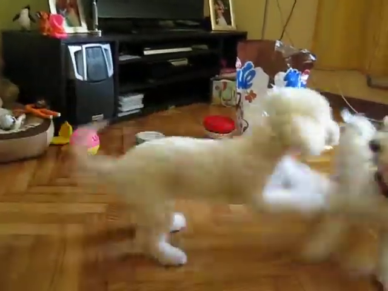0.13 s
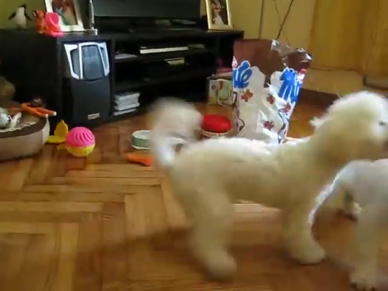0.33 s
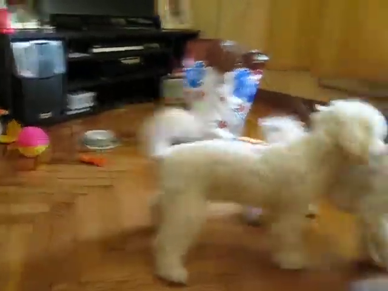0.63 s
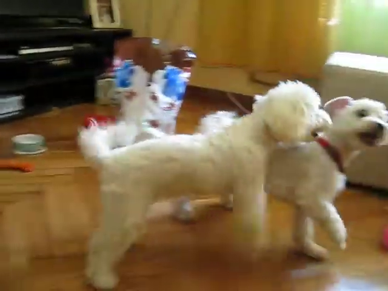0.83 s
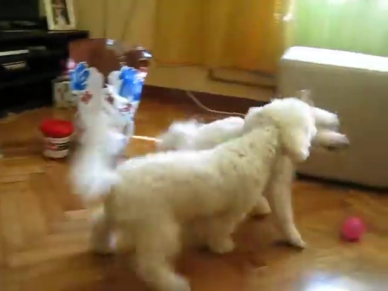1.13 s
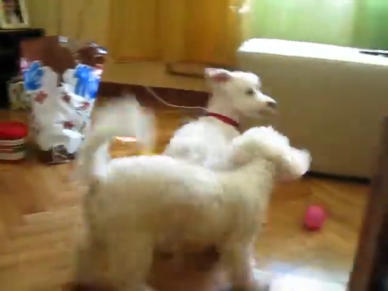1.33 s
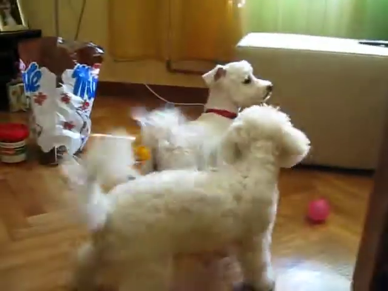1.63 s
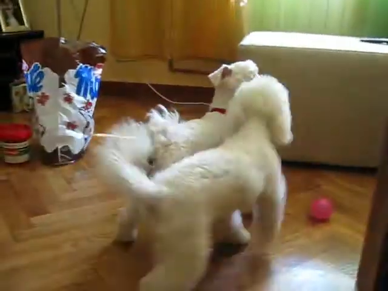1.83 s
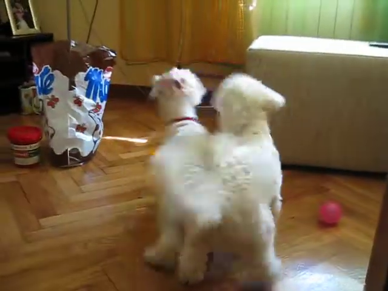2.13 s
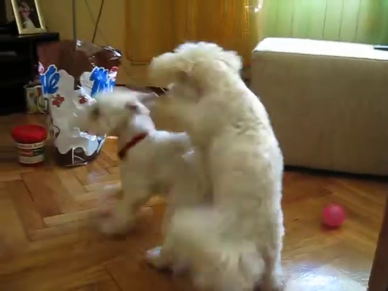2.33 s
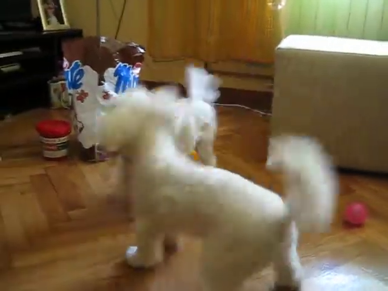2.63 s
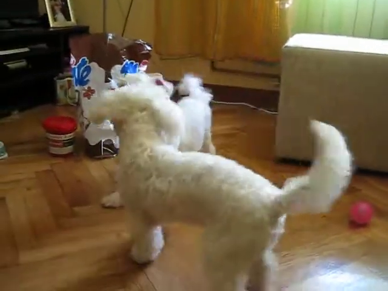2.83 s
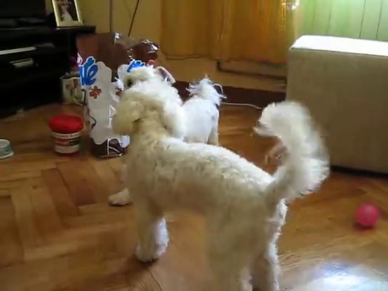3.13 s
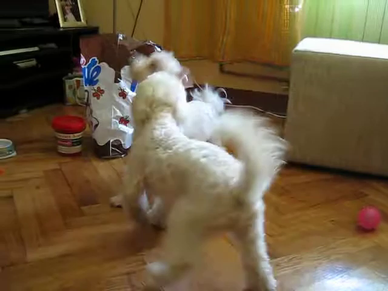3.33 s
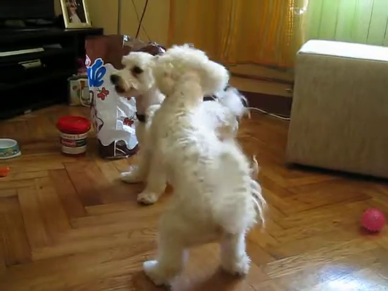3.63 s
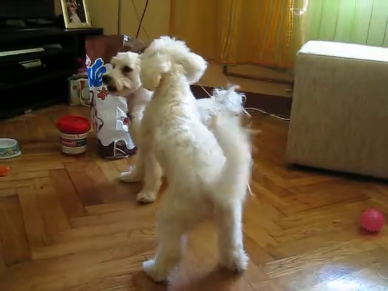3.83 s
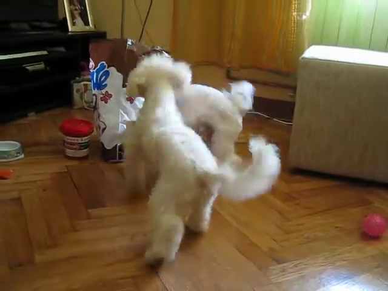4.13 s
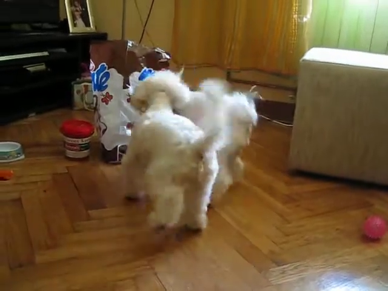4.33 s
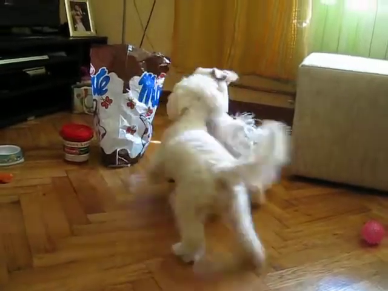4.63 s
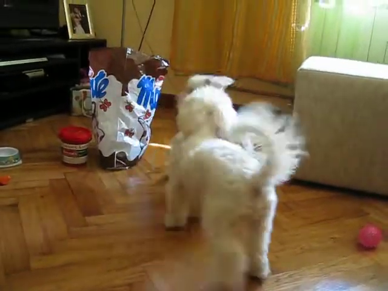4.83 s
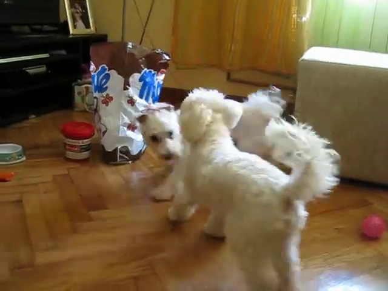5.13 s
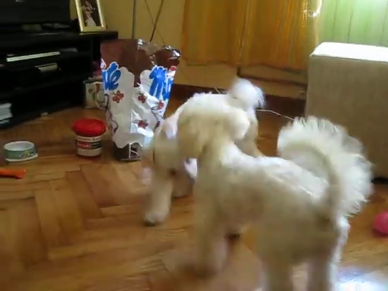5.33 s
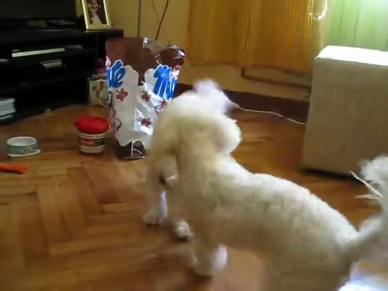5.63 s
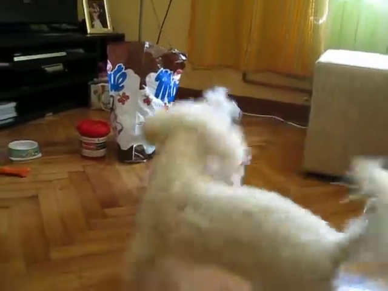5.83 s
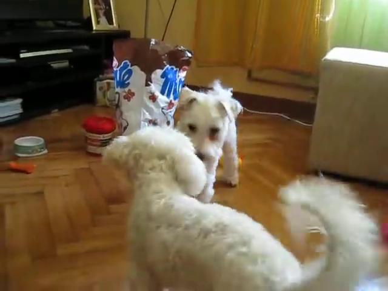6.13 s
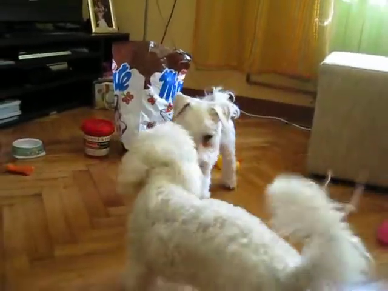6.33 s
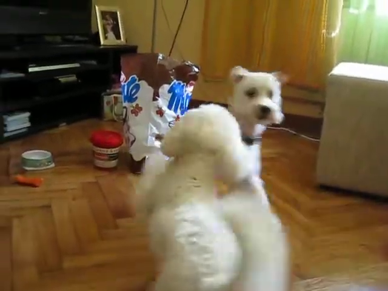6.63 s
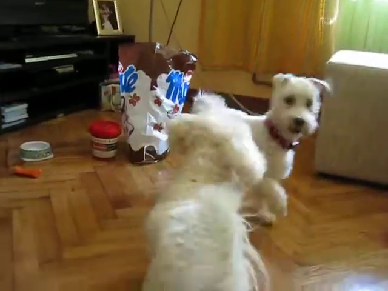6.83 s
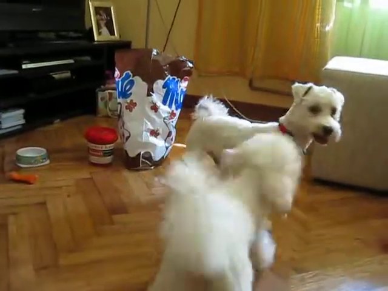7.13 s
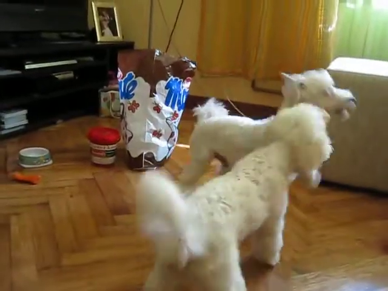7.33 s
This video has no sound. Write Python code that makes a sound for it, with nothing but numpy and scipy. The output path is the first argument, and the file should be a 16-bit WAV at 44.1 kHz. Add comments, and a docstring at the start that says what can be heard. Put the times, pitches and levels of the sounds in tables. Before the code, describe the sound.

Claws rattle quickly on hardwood at once, then thin out into separate ticks and scrapes. A strong flurry of clicks and low paw knocks erupts a little past two seconds, drops almost to stillness, and resumes as lighter scuffling with a tiny metallic tag jingle. Later steps grow sparse and soft before a last hard tick. Close, slightly dull handheld pickup in a lively living room, with faint air and hiss.

```python
"""A living room with a parquet floor: two small dogs wrestle a step or two from a hand-held camera.
Claws tick and skid on the wood, paws thump and squeak: short noisy pushes and rubs through resonances.
Fur brushes as filtered grainy noise; now and then a metal collar tag tinkles as a set of decaying sines.
A diffuse noise tail answers the contacts; under it all lie faint still air and a thin microphone hiss."""
import sys
import numpy as np
from scipy import signal
from scipy.fft import rfft, irfft, next_fast_len
from scipy.io import wavfile
from scipy.ndimage import uniform_filter1d, map_coordinates

SR = 44100
rng = np.random.default_rng(int(sys.argv[2]) if len(sys.argv) > 2 else 0)


def digitize_waveform(pressure):
    """Quantize a signal to 16-bit integers and store it at the path in sys.argv[1].

    Rows of a 2-D input are taken as channels; values are limited to [-1, 1].
    """
    field = np.atleast_2d(pressure).T
    bounded = np.clip(field, -1, 1)
    quanta = np.round(bounded * 32767).astype(np.int16)
    wavfile.write(sys.argv[1], SR, quanta)


N = 329427  # samples in the scene
SIZE = 2 ** 12  # samples in one short contact
HZ, TIME = np.fft.rfftfreq(SIZE, 1 / SR), np.arange(SIZE) / SR

# colour of feet and coats rubbing, before each rub's own resonance: (f/Hz, level/dB)
RUB_COLOUR = [(100, -22), (350, 4), (1000, 4.5), (2000, 0), (5000, -6.5), (9000, -7), (16000, -23)]


def amp(db):
    """Gain of a level in dB."""
    return 10 ** (np.asarray(db) / 20)


def unit(x):
    """x at rms 1."""
    return x / np.sqrt(np.mean(x ** 2) + 1e-20)


def along(points, hz):
    """Values between (f/Hz, value) points, on a log frequency axis."""
    f, v = np.transpose(points)
    return np.interp(np.log(hz + 1), np.log(f + 1), v)


def hump(hz, centre, q):
    """Gain of one broad resonance."""
    ratio = (hz + 1) / centre
    return 1 / np.sqrt(1 + (q * (ratio - 1 / ratio)) ** 2)


def filtered(x, response):
    """x times a response of frequency."""
    m = next_fast_len(len(x) + SR // 2)
    spectrum = rfft(x, m) * response(np.fft.rfftfreq(m, 1 / SR))
    return irfft(spectrum, m)[:len(x)]


def causal(x, gain):
    """A short sound through the minimum-phase filter of this gain, so that nothing rings ahead of the touch."""
    cepstrum = irfft(np.log(np.maximum(gain, 1e-6)))
    cepstrum[1:SIZE // 2] *= 2
    cepstrum[SIZE // 2 + 1:] = 0
    return irfft(rfft(x) * np.exp(rfft(cepstrum)))


def add(track, s, x):
    """Mix x into the track at s seconds."""
    start = max(round(s * SR), 0)
    track[start:start + len(x)] += x[:max(N - start, 0)]


def contact(gain, t60, room_db, snap, span, grit=0.7):
    """A sharp push, its uneven chatter and the room's answer; the direct part has the energy of rms 1 over span s."""
    catches = rng.standard_normal(SIZE) * np.exp(grit * rng.standard_normal(SIZE))
    chatter = catches * amp(-60 * TIME / max(t60, .002))
    chatter /= np.linalg.norm(chatter)
    chatter[0] += snap  # the first touch is the sharpest
    blow = causal(chatter, gain)
    push = causal(1. * (TIME == 0), gain)
    out = answer(push / np.linalg.norm(push), room_db)  # the room keeps the blow's colour but blurs its chatter
    out[:SIZE] += blow / np.linalg.norm(blow)
    return out * np.sqrt(span * SR)


def claws():
    """The hard strikes as the dogs push off and land, each a nail on wood."""
    # (t/s, level/dB, wood f/Hz, wood over the nail/dB, nail f/Hz, crack over the nail/dB, room/dB)
    strikes = [(.003, -24, 3270, -9, 5800, 1, 0), (.062, -21, 3600, -3, 5300, 1, -6),
               (.077, -24, 2220, -12, 6200, -6, -2), (.097, -25.5, 1450, -10, 4650, -3, -3),
               (.118, -25, 3600, -6, 5000, -5, -6), (0.179, -26, 1140, -1, 4700, -3, -4),
               (.2105, -20.5, 2350, -11, 5030, -9, -1.5), (0.252, -14, 3170, -20, 4330, -4, -9),
               (.2565, -16, 3250, -18, 4450, -5, -6), (.271, -14, 2720, -11, 6440, -5, -9),
               (.304, -25, 3600, -4, 4500, -1, -2), (.329, -27.5, 3600, 9, 4410, 7, 4),
               (.381, -24.5, 2620, -10, 3960, 1, -2), (.539, -38, 3280, 19, 3580, -2, 4),
               (.8565, -18.5, 1300, -7.5, 5700, 1.5, -5), (1.037, -22, 3540, 8, 3640, 1, -4.5),
               (1.159, -28, 1920, -22, 4900, -3.5, 4), (1.226, -22.5, 2200, -5, 5500, -3, -3.5),
               (1.288, -25.5, 1010, -16, 6100, 1, -2), (1.314, -25.5, 2580, 4, 5400, 0, -4.5),
               (1.471, -29.5, 1010, -16, 3660, 0.5, -4.5), (1.705, -29, 2730, 18, 3620, -14, 0),
               (1.83, -31.5, 3250, -16, 7140, -2, 0), (2.021, -20, 1720, 1, 4800, -5, -11),
               (2.027, -23, 1660, -19, 5320, 3, 5.5), (2.101, -23.5, 3600, -6, 4390, 2, -0.5),
               (2.176, -29, 2820, -10, 4900, -0.5, 7.5), (2.287, -14.5, 3500, -1, 6700, -14, -2.5),
               (2.29, -17.5, 2230, 1.5, 4400, 6, 0.5), (2.36, -21, 3480, -6, 4760, 3, 5.5),
               (2.38, -12, 3600, -8, 4040, 2, -3), (2.397, -26.5, 3170, -3, 5840, 1, 11),
               (2.456, -25.5, 2780, 0, 4870, -3, -13), (2.5, -23, 3450, -18, 5900, -20, -8),
               (2.617, -17, 1140, -11, 6100, -12, -1), (2.62, -17, 2670, -6, 4020, 4.5, -3.5),
               (2.712, -13.5, 3080, -0.5, 3640, 2, 3), (2.713, -14, 1720, 0, 5240, 4, 3.5),
               (3.275, -30.5, 1500, -6, 4270, -2, 6.5), (3.282, -36, 1510, -20, 4900, 3, 2),
               (3.3693, -24.5, 3230, -17, 5190, -1, 4.5), (3.468, -29, 3120, -7, 5540, 9, 0),
               (3.61, -25, 2600, 11, 3870, 5, -2.5), (4.034, -29, 2900, -18, 4870, -10, 6.5),
               (4.079, -23, 2740, -0.5, 5800, -3, 0), (4.105, -28, 1010, -5, 4240, 2, 0),
               (4.127, -29.5, 2460, -3, 4620, 2, 15.5), (4.143, -20, 2690, -11, 3800, -9, -4),
               (4.436, -20.5, 2730, -4, 3900, -1.5, 1.5), (4.6355, -26, 2190, -7, 4420, -2.5, -2.5),
               (4.802, -21.5, 3320, -4, 4900, -14, 0), (4.809, -24.5, 3280, 4, 4840, 7, -7),
               (4.87, -27.5, 2030, -4, 4330, -10, 0), (4.995, -31.5, 1690, -9, 3920, 1, 11.5),
               (5.018, -29.5, 1760, -7, 4530, -4, 3), (5.229, -33, 3600, -22, 4740, 3, 2),
               (5.241, -24, 3560, -36, 5200, -14, -2), (5.319, -20, 2100, -7.5, 4680, -3.5, 2.5),
               (5.3306, -25, 1010, -22, 4930, 4, -12), (5.438, -20, 2100, 0, 3700, -16, 0),
               (5.6957, -34.5, 3340, -13, 4730, -8, -0.5), (5.831, -21.5, 2750, 2, 4900, 4.5, 0),
               (5.884, -20.5, 3140, -3.5, 5070, -2, -3.5), (6.003, -40.5, 2130, -15, 6330, 8, 3.5),
               (6.108, -37.5, 3170, 17, 3830, -12, -7), (6.176, -32.5, 1290, 3, 3060, -25, -13),
               (6.253, -40, 3600, 0, 3730, -1, -1), (6.468, -39, 2800, 8, 5500, 4, 4),
               (6.487, -35, 2800, 0, 4000, 2, 2), (6.512, -31.5, 3010, -9, 6000, 6, 3),
               (6.579, -35.5, 1610, -5, 4930, -2, 2), (6.639, -29, 3600, -18, 4300, -6, -12),
               (6.697, -32, 2880, -3, 4950, -22, -7), (6.847, -37, 1450, 20, 3620, -5, -15),
               (7.175, -33.5, 2050, -1, 4670, 2, 0.5), (7.265, -21, 3630, -6, 3850, -0.5, -1),
               (7.381, -17.5, 3520, 0.5, 5600, -8, -4.5)]
    out = np.zeros(N)
    for s, *strike in strikes:
        add(out, s, claw(*strike))
    return out


def claw(db, wood_hz, wood_db, nail_hz, crack_db, room_db, wood_q=3.6, nail_q=3.3, skirt=0.79, spot_db=2):
    """A hard nail ticks on the wood: both ring briefly, coloured by the spot, and the tip adds a bright crack."""
    # general colour of a strike: (f/Hz, level/dB)
    strike_colour = [(150, -9), (600, -1), (1200, 4), (3000, 2.5), (6000, 5), (9000, 0), (16000, -16)]
    # colour of the bright crack: (f/Hz, level/dB)
    tip_colour = [(3000, -14), (7000, 4), (9400, 5), (11500, 2), (14000, -1), (16000, -4.5)]
    usual_t60_s, usual_db, crisp_db = 0.019, -28, 18  # each crisp_db above the usual level halves the chatter
    spot = np.column_stack([np.geomspace(600, 16000, 60), spot_db * rng.standard_normal(60)])
    colour = amp(along(strike_colour, HZ) + along(spot, HZ))
    crack = amp(crack_db) * unit(amp(along(tip_colour, HZ)))
    wood = amp(wood_db) * unit(colour * hump(HZ, wood_hz, wood_q) ** skirt)
    nail = unit(colour * hump(HZ, nail_hz, nail_q) ** skirt)
    t60 = usual_t60_s * 2 ** (-max(db - usual_db, 0) / crisp_db)
    gain = np.sqrt(wood ** 2 + nail ** 2 + crack ** 2)
    return amp(db) * contact(gain, t60, room_db, snap=.35, span=0.0011)


def paws(thump_db=13, thump_q=3, knock_q=2.5):
    """Soft pads land on the parquet: a low thump of the weight and a higher knock, both coloured by the boards."""
    # (t/s, level/dB before an 11 dB trim, thump f/Hz, weight of the thump/dB on top of thump_db, knock f/Hz)
    landings = [(.177, -24, 480, 2, 560), (.2, -29, 340, -13, 563), (.347, -26, 490, -22, 1050),
                (1.224, -20, 400, -18, 636), (1.24, -31, 403, 9, 674), (1.468, -34, 360, -28, 832),
                (1.723, -32, 496, -12, 1000), (2.02, -28, 520, -11, 765), (2.288, -20, 450, -37, 820),
                (2.396, -18, 480, -34, 690), (2.615, -26, 310, -23, 765), (2.711, -16.5, 520, -21, 1600),
                (2.719, -13, 490, -17.5, 900), (2.737, -12.5, 500, -20, 925), (4.104, -29.5, 390, -18, 945),
                (4.14, -19.5, 377, -16, 740), (5.11, -30, 335, -19, 740), (5.332, -27, 304, -23, 865),
                (5.437, -25, 513, -29, 1010), (6.423, -35, 240, -25, 696), (6.573, -28, 555, -16.5, 1470),
                (6.684, -32, 520, -11, 789), (6.843, -20.5, 496, -21, 1170), (7.133, -31.5, 238, -23, 800),
                (7.378, -27, 507, -16, 1180)]
    # general colour of a landing: (f/Hz, level/dB)
    pad_colour = [(60, -23), (130, -5), (240, -6.5), (400, -3.5), (800, 1.5), (1600, -8), (3000, 0),
                  (8000, -24)]
    # modes of the floor: (f/Hz, width/Hz, level/dB)
    boards = [(352.5, 72, -3), (740, 52, -4), (965, 29, 0), (1580, 240, 1)]
    out = np.zeros(N)
    floor = amp(along(pad_colour, HZ))
    for hz, width, db in boards:
        floor = floor + amp(db) * hump(HZ, hz, hz / width) ** 2
    for s, db, thump_hz, weight_db, knock_hz in landings:
        thump = amp(thump_db + weight_db) * unit(floor * hump(HZ, thump_hz, thump_q))
        knock = unit(floor * hump(HZ, knock_hz, knock_q))
        landing = contact(np.hypot(thump, knock), t60=0.026, room_db=-2.5, snap=0.57, span=0.0049)
        add(out, s, amp(db - 11) * landing)
    return out


def sliding(grain_rate=500, grain_share=1.0, tick_rate=70, tick_db=-12, patchy_db=6.0):
    """Paws and nails skid: fine catches (rates per s) over a soft rub, through an uneven resonance, and nail ticks."""
    # (t/s, length/s, level/dB, centre f/Hz, sharpness Q)
    scuffles = [(0, .13, -46.5, 4200, 0.35), (0.191, 0.033, -34.5, 2510, 0.98),
                (0.273, 0.035, -38, 4500, .9), (.39, 0.14, -43.5, 3070, 1),
                (0.657, 0.043, -52.5, 3880, 1.4), (.887, 0.12, -44, 3250, 0.85),
                (0.948, 0.051, -45, 1340, 3.4), (1.029, 0.022, -39, 2030, 12),
                (1.146, 0.08, -47, 1840, 3.7), (1.216, 0.067, -43.5, 3000, 0.98),
                (1.858, 0.06, -42.5, 4370, 1.6), (2.016, 0.036, -28.5, 5430, 1.7),
                (2.079, 0.094, -44.5, 4500, 0.21), (2.341, 0.074, -35.5, 4430, 2.1),
                (2.414, 0.066, -50, 3000, 1.3), (2.531, 0.086, -40.5, 1970, 2.6),
                (2.592, 0.02, -37, 4540, 1.7), (2.628, 0.018, -33.5, 3000, .7),
                (3.38, .027, -35.5, 5560, 2.3), (3.387, 0.043, -43, 1500, 2.4),
                (4.008, 0.036, -46.5, 5200, 3.7), (4.028, 0.022, -38, 2750, 16),
                (4.111, 0.049, -35, 3500, 0.89), (4.436, 0.023, -45, 2520, 4),
                (4.483, 0.032, -40, 5430, 0.79), (4.817, 0.048, -39, 4900, 0.55),
                (4.912, 0.075, -42.5, 5200, 2.7), (5.246, 0.084, -63, 4500, 11),
                (5.446, 0.047, -36.5, 2260, 0.69), (6.474, .1, -45.5, 4600, 1.5),
                (6.845, 0.05, -49.5, 3250, 2.4), (6.87, 0.046, -45.5, 6170, .7),
                (7.124, 0.051, -46, 1920, 5), (7.226, 0.031, -43.5, 2100, 7),
                (7.267, .084, -48.5, 3700, 17), (7.359, 0.13, -43, 3520, 1.3)]
    out, size = np.zeros(N), SR // 2

    def catches(rate):
        """Touches of random strength at chance moments, at rms 1."""
        return unit((rng.random(size) < rate / SR) * rng.standard_normal(size))

    for s, length, db, centre, q in scuffles:
        n = int(max(length, .005) * SR)
        spot = np.column_stack([np.geomspace(400, 16000, 30), patchy_db * rng.standard_normal(30)])
        rough = grain_share * catches(grain_rate) + rng.standard_normal(size)
        rub = filtered(rough, lambda hz: amp(along(RUB_COLOUR, hz) + along(spot, hz)) * hump(hz, centre, q))
        scrape = unit(rub[:n])
        ticks = unit(filtered(catches(tick_rate), lambda hz: hump(hz, centre=5200, q=1.0)))[:n]
        swell = signal.windows.tukey(n, .7)
        stroke = (scrape + amp(tick_db) / max(q, 1) * ticks) * swell  # a sharp resonance leaves fainter ticks
        add(out, s, amp(db) * in_room(stroke, room_db=-2.0))
    return out


def squeaks(waver=0.018, glide_octaves=-0.133):
    """A pad catches on the varnish, sticks and slips: a short, unsteady tone that sags in pitch as the pad slows."""
    # (t/s, peak level/dB before the room, starting f/Hz, length of the glide/s)
    slips = [(0.211, -26, 5630, 0.011), (0.945, -32.5, 1310, .012), (1.222, -36.5, 437, 0.021),
             (1.468, -43, 870, 0.0089), (3.195, -35.5, 680, 0.0061), (4.637, -36, 2170, .01),
             (4.994, -28.5, 1796, 0.014), (5.236, -36.5, 4580, .04)]
    out = np.zeros(N)
    for s, db, pitch, length in slips:
        drift = unit(uniform_filter1d(rng.standard_normal(SIZE), size=60))
        progress = TIME / max(length, .004)
        glide = 2 ** (glide_octaves * np.minimum(progress, 1))
        phase = 2 * np.pi * np.cumsum(pitch * glide * (1 + waver * drift)) / SR
        swell = 4 * progress * np.exp(1 - 4 * progress)  # fullest a quarter of the way
        add(out, s, amp(db) * in_room(swell * np.sin(phase), room_db=-3.5))
    return out


def collar_tag():
    """The small metal plate rings as it swings against its ring; each mode flutters anew as the tag twists."""
    # (t/s, level/dB before a 6 dB trim)
    touches = [(3.3706, -32.5), (4.437, -48), (4.482, -36), (5.690, -61)]
    # modes of the plate: (f/Hz, level within the touch/dB, 60 dB decay/s)
    plate_modes = [(5448, -9, .3), (9383, -16, .35), (12462, -3, .6), (13010, -14, .25), (13650, -17, .2),
                   (15120, -4, .24)]
    out, t = np.zeros(N), np.arange(SR // 2) / SR
    for s, db in touches:
        for hz, level, t60 in plate_modes:
            flutter_db = 3.5 * map_coordinates(rng.standard_normal(40), [t * 60])  # 60 random points a second
            level_db = db + level + flutter_db - 6 - 60 * t / t60
            add(out, s, amp(level_db) * np.sin(2 * np.pi * hz * t))
    return out


def light_steps(wood_hz=2900, nail_hz=4800):
    """Between the strikes the dogs shift their feet: faint ticks at chance moments, firmer as the tussle grows."""
    rate, step_db, spread_db = 7, -41.5, 2  # steps per second, usual level and scatter in dB
    grows = 1  # dB of step for each dB of tussle
    out = np.zeros(N)
    usual_db = np.mean(tussle_db(np.arange(N) / SR))
    for step in range(int(rate * N / SR)):
        s = (step + rng.random()) / rate
        db = step_db + grows * (tussle_db(s) - usual_db) + spread_db * rng.standard_normal()
        add(out, s, claw(db, wood_hz, wood_db=-14, nail_hz=nail_hz, crack_db=-3.5, room_db=-1))
    return out


def fur(patchy_db=3.0, grit=1.0):
    """Coats and feet brush all the while: a grainy rustle that follows the tussle, each brush with its own colour."""
    level_db, centre_hz, q = -6.5, 3000, 0.76  # level over the tussle, broad resonance
    catches = rng.standard_normal(N) * np.exp(grit * rng.standard_normal(N))
    z = signal.stft(catches, nperseg=512)[2]
    patches = uniform_filter1d(rng.standard_normal(z.shape), size=6, axis=0)  # smooth over frequency
    patches = unit(uniform_filter1d(patches, size=9, axis=1))  # and over time
    brushes = signal.istft(z * amp(patchy_db * patches), nperseg=512)[1][:N]
    rub = unit(filtered(brushes, lambda hz: amp(along(RUB_COLOUR, hz)) * hump(hz, centre_hz, q)))
    return amp(tussle_db(np.arange(N) / SR) + level_db) * rub


def tussle_db(s):
    """How hard the dogs tussle at s seconds, as a level that the fur and the light steps follow."""
    # (t/s, level/dB)
    tussle = [(0.0, -34), (0.14, -38), (0.35, -48), (0.6, -51), (0.87, -43.5), (1.04, -39.5), (1.16, -42.5),
              (1.52, -51.5), (1.71, -53.5), (2.23, -39), (2.56, -41.5), (2.68, -39), (2.91, -74),
              (3.24, -48.5), (3.45, -48.5), (3.91, -48.5), (4.26, -42), (4.47, -50.5), (5.43, -49.5),
              (5.58, -51), (6.45, -59), (6.7, -40), (6.95, -58), (7.18, -48.5), (7.32, -43.5), (7.47, -49)]
    return np.interp(s, *np.transpose(tussle))


def in_room(x, room_db):
    """x followed by the room's answer."""
    wet = answer(x, room_db)
    wet[:len(x)] += x
    return wet


def answer(x, room_db, build=0.0049, wall_db=-16, count=7):
    """What the room returns from a new spot: a few near surfaces and a diffuse tail that builds (in s) and decays."""
    # decay of the tail: (f/Hz, 60 dB decay/s)
    decay_s = [(200, 0.33), (600, 0.31), (1500, 0.45), (4000, 0.46), (9000, 0.36), (16000, 0.2)]
    # colour of the tail: (f/Hz, level/dB)
    tail_colour = [(200, 9.5), (1000, 1), (4000, -2), (9000, -4), (16000, 4)]
    hz, t, z = signal.stft(rng.standard_normal(SR // 2), SR, nperseg=256)
    tail_db = along(tail_colour, hz)[:, None] - 60 * t / along(decay_s, hz)[:, None]
    z = z * amp(tail_db) * (1 - np.exp(-t / build))
    tail = signal.istft(z, SR, nperseg=256)[1]
    tail /= np.linalg.norm(tail)
    surfaces = (rng.uniform(.003, .022, count) * SR).astype(int)
    tail[surfaces] += amp(wall_db) * rng.choice([-1, 1], count)
    return amp(room_db) * signal.fftconvolve(x, tail)


def room_tone(air_db=-54, fizz_db=-59):
    """Faint still air as coloured noise, and the thin hiss of the microphone above it."""
    # colour of the air: (f/Hz, relative level/dB)
    air_colour = [(15, -30), (30, -10), (60, -7.5), (130, -2), (250, -2.5), (450, -5), (700, -6.5),
                  (1200, -11), (2400, -19), (3800, -16.5), (7000, -29), (9100, -70)]
    fizz_colour = [(4000, 6), (7000, 6), (9500, 5.5), (16000, 7)]  # (f/Hz, relative level/dB)
    air = unit(filtered(rng.standard_normal(N), lambda hz: amp(along(air_colour, hz))))
    fizz = unit(filtered(rng.standard_normal(N), lambda hz: amp(along(fizz_colour, hz))))
    return amp(air_db) * air + amp(fizz_db) * fizz


def scene():
    """Everything that the dogs set sounding, over the quiet of the room."""
    strikes = claws() + paws() + light_steps()
    rubs = sliding() + squeaks() + fur()
    return (strikes + rubs + collar_tag() + room_tone())[None]


def record(dry, notch_hz=7880, notch_width_hz=1900, top_hz=15850):
    """The camera has a deep notch in the treble and keeps nothing above its band limit."""
    def response(hz):
        """Gain of the notch below the band limit."""
        off_centre = notch_hz ** 2 - hz ** 2
        return off_centre / (off_centre + 1j * hz * notch_width_hz) * (hz < top_hz)

    return filtered(dry[0], response)[None]


dry = scene()
out = record(dry)
digitize_waveform(out)
```